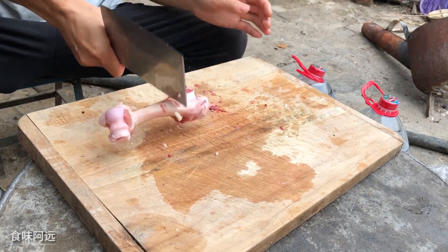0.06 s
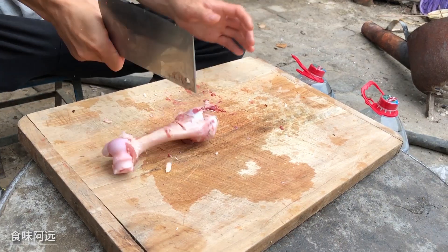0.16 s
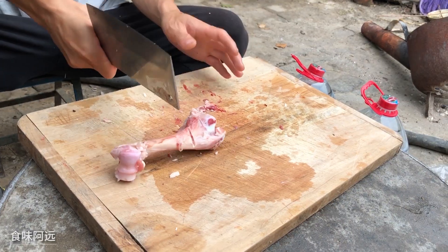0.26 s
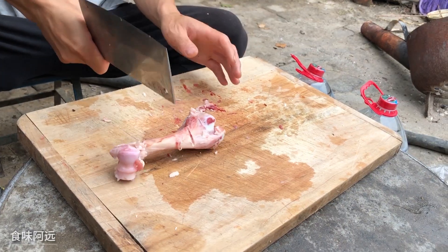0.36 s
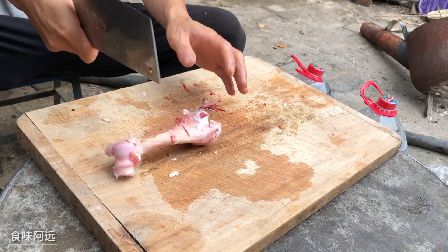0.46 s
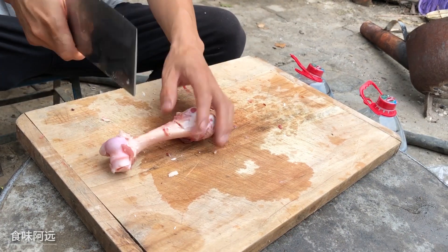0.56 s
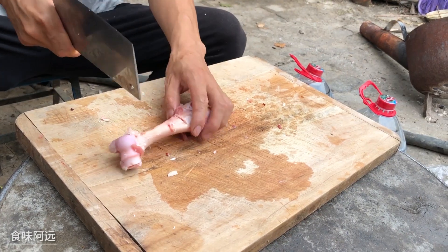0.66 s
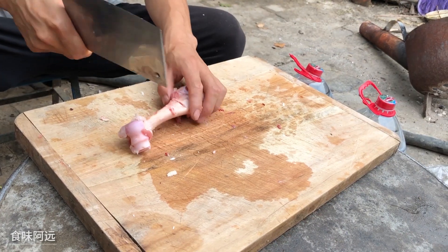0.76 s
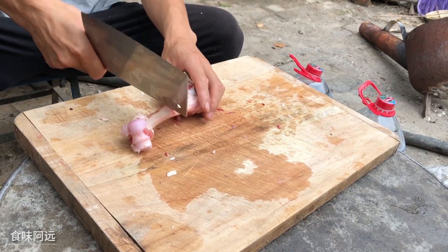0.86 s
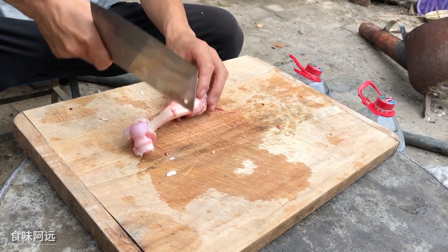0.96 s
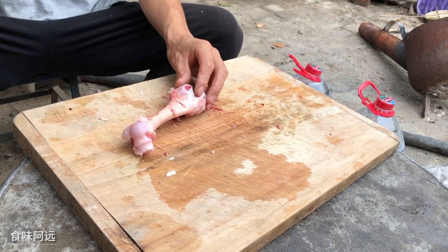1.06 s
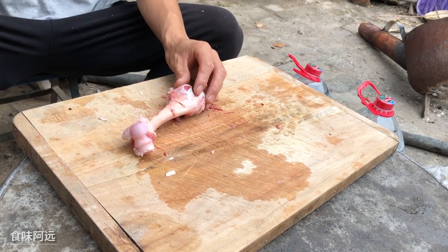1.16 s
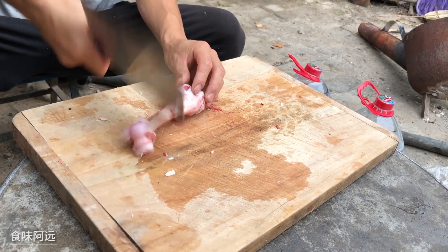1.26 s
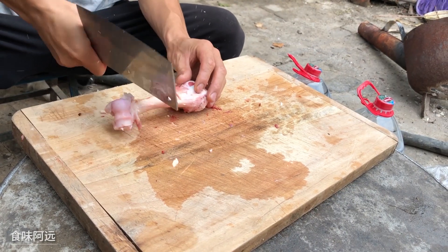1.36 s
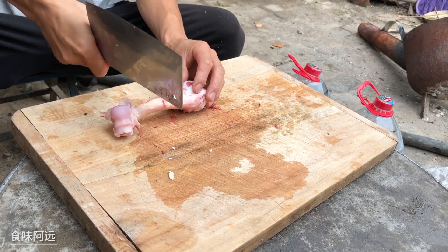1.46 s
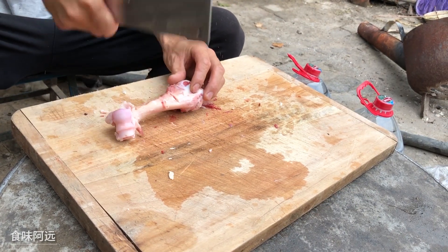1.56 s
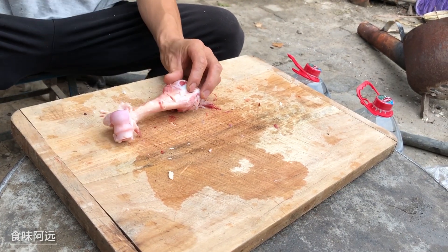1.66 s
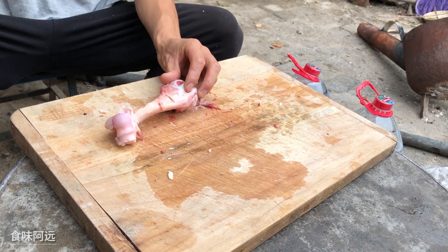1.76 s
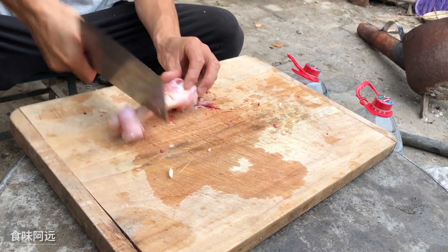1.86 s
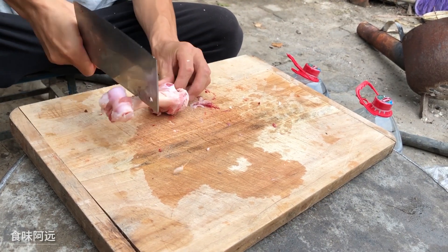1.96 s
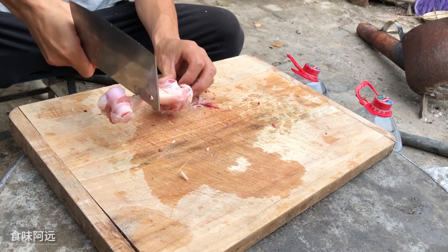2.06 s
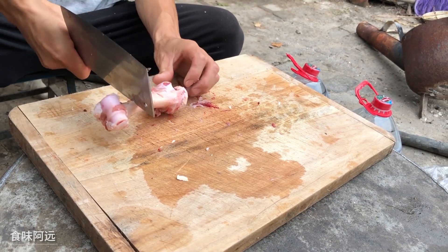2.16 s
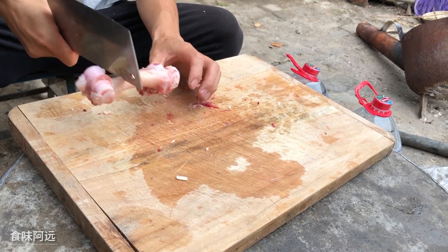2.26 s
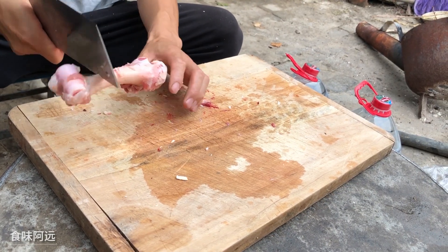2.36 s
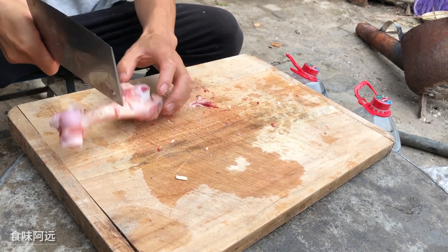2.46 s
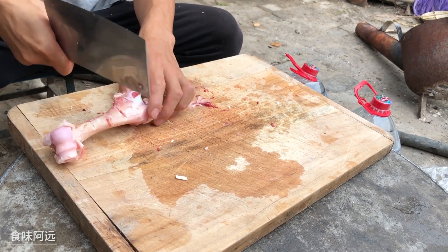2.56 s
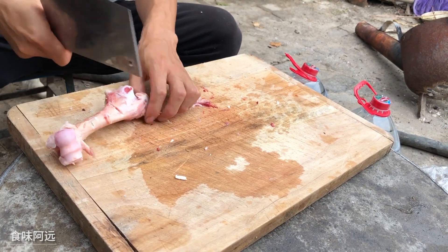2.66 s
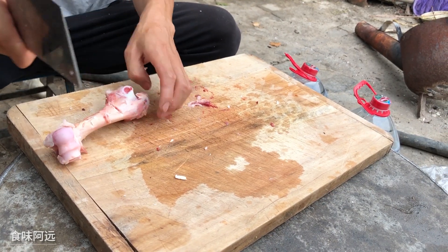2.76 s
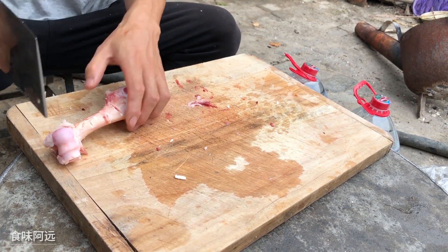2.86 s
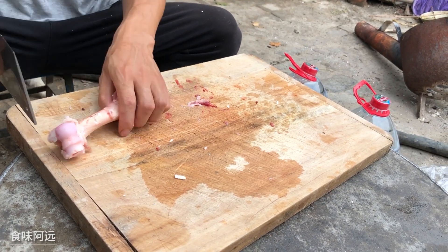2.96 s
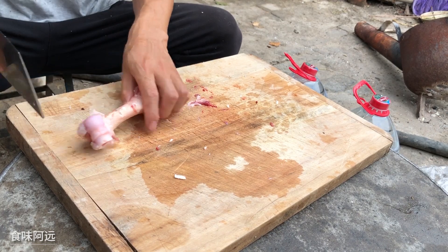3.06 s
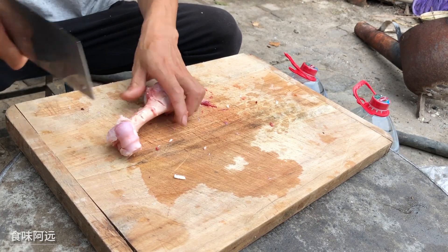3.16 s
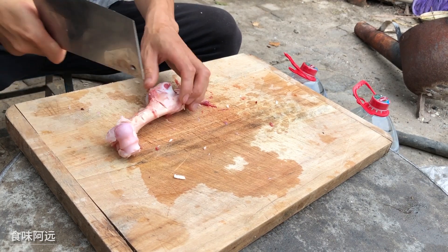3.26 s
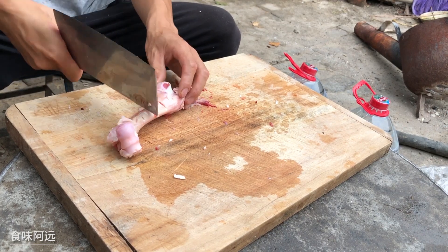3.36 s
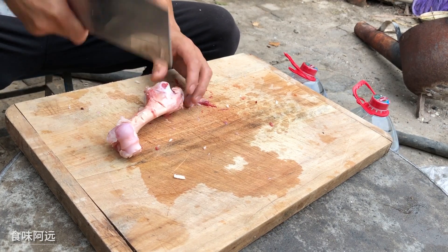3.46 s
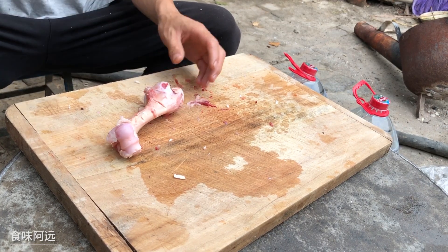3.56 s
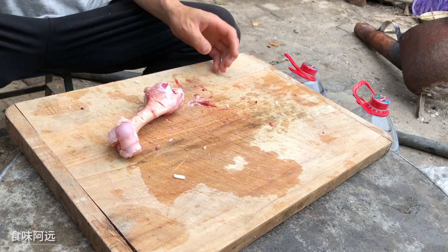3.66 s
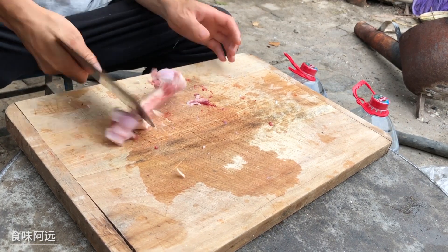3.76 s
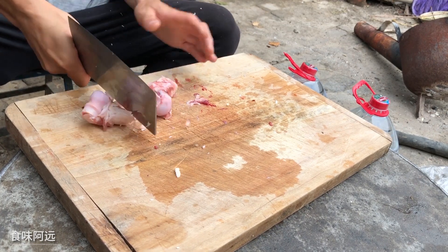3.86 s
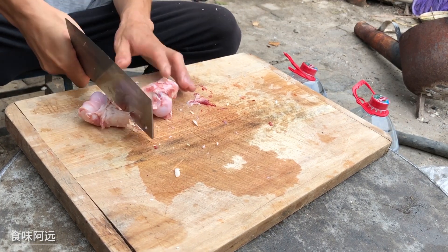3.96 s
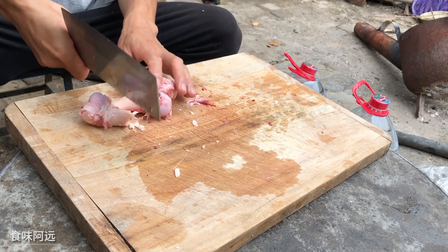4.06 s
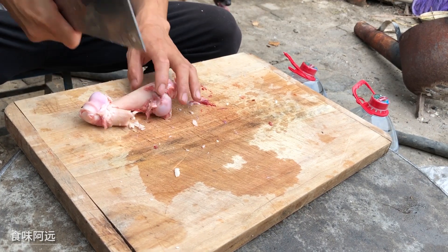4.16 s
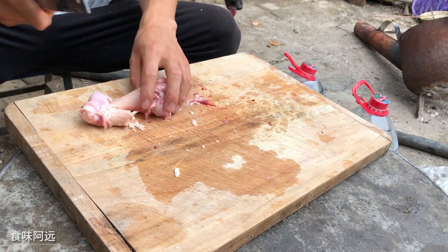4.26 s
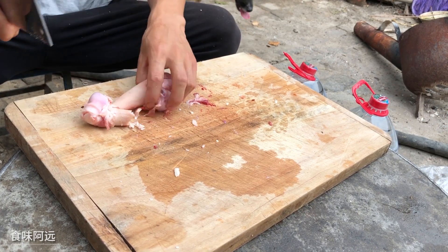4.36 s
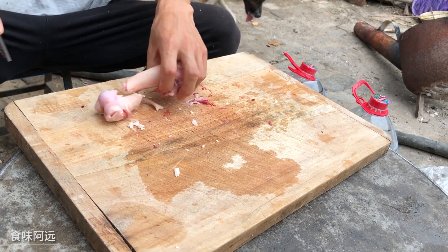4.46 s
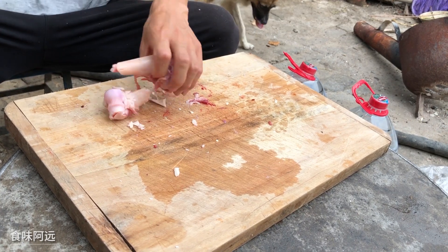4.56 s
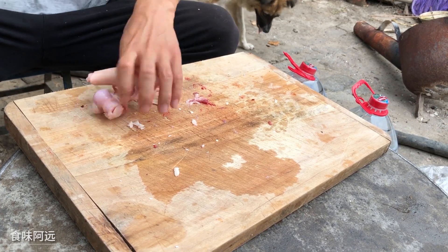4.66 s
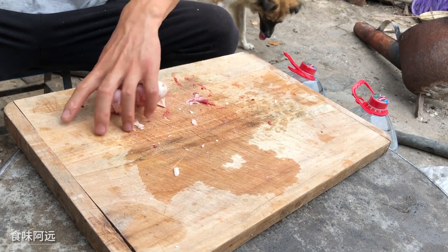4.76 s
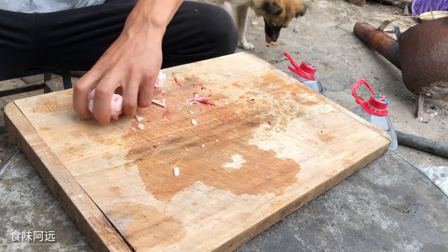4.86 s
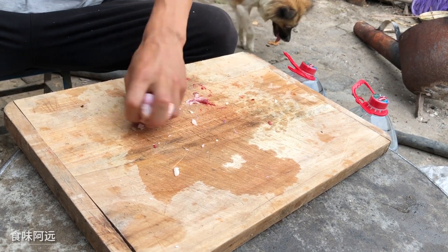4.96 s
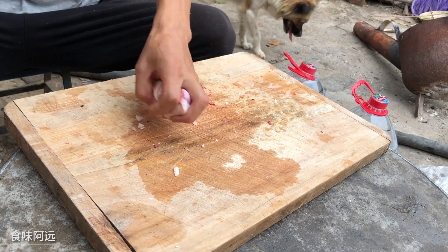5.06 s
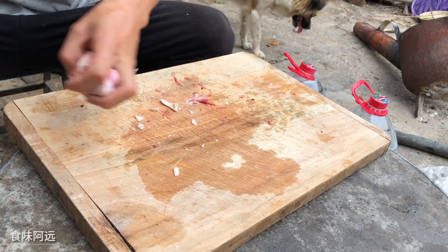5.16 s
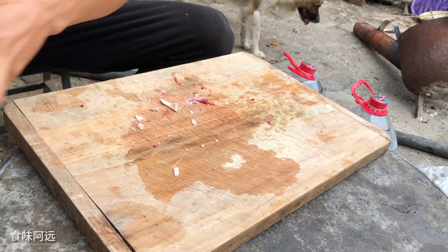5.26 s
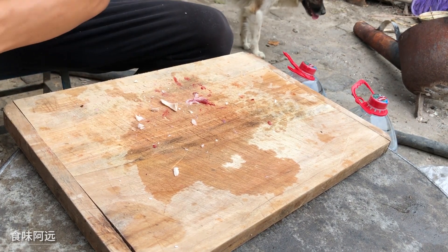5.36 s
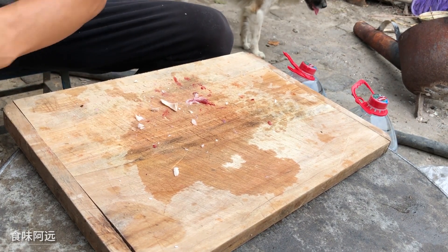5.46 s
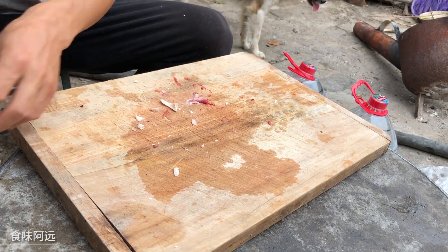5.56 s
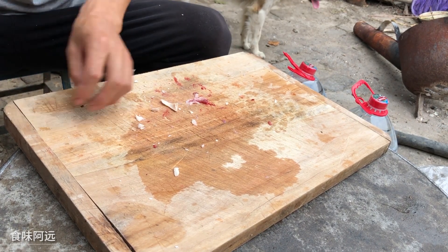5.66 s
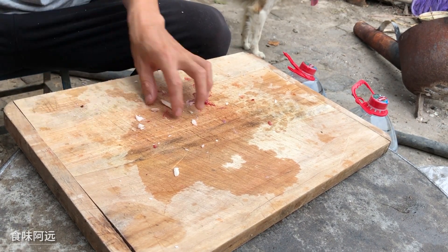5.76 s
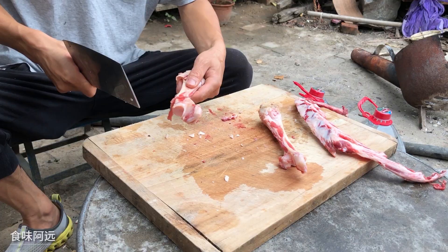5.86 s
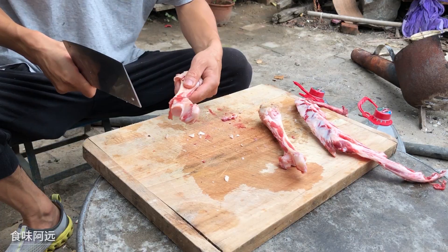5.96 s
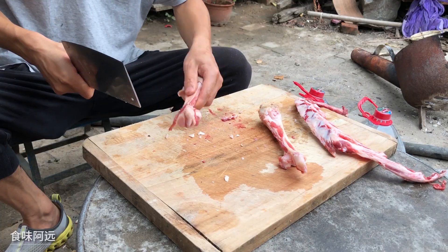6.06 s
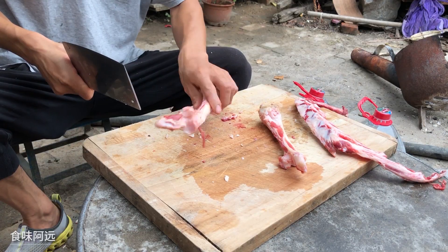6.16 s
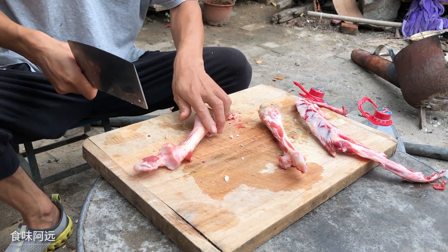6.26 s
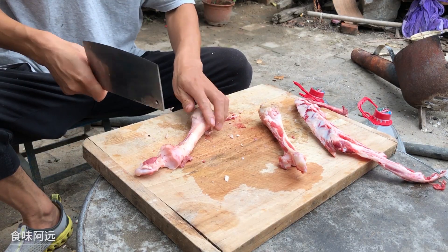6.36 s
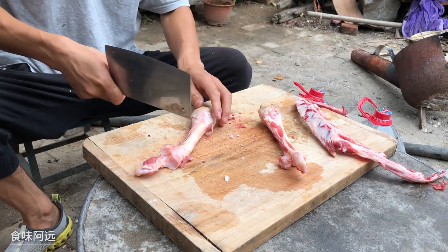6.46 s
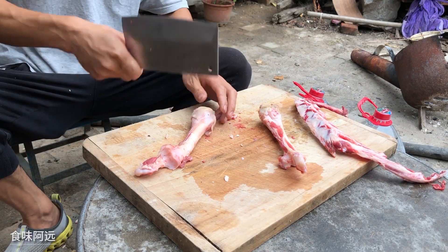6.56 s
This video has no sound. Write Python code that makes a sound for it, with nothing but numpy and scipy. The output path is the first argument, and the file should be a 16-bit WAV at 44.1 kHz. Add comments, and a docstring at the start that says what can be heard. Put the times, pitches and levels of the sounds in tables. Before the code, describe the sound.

A cleaver strikes a leg bone on a thick wooden board outdoors, sharp cracking thuds at uneven intervals, with bone knocks and wet scraping between.

```python
"""Over a low outdoor rumble, two faint ticks lead into the first blow of a cleaver on a leg bone.
Each blow superposes a broadband crack, the modes of a thick wooden board and those of a steel blade;
a wash of rattle and yard echo, as shaped noise, swells and dies after it.
Between blows a hand drags the wet bone: stick-slip noise through the board, sticky ticks and knocks.
A thin high whistle, a sine of unsteady pitch, passes late in the scene."""
import sys
import numpy as np
from scipy import signal
from scipy.fft import rfft, irfft
from scipy.io import wavfile
from scipy.ndimage import uniform_filter1d

SR = 44100
rng = np.random.default_rng(int(sys.argv[2]) if len(sys.argv) > 2 else 0)


def dump_mix(stems):
    """Bounce the given channels to the path in sys.argv[1] as a 16-bit WAV at rate SR."""
    frames = np.atleast_2d(stems).T  # one column per channel
    limited = np.clip(frames, -1, 1)  # hard clip at full scale
    pcm = np.round(limited * 32767).astype(np.int16)
    wavfile.write(sys.argv[1], SR, pcm)


N = 291060

# Spectrum of the outdoor rumble: f/Hz, relative level per Hz/dB
RUMBLE_SPECTRUM = [(15, -49.5), (25, -26), (40, -8.5), (65, -4.5), (201, -9.5), (243, -19.5), (466, -21.5),
                   (519, -25), (645, -25.5), (943, -31.5), (3190, -40.5), (14900, -52), (16200, -45)]
# Course of the rumble, which dips and recovers: t/s, rms level/dB
RUMBLE_LEVEL = [(0.0, -47.5), (0.5, -60), (0.77, -55.5), (0.97, -53), (1.47, -53.5), (1.69, -62),
                (1.97, -67.5), (2.11, -47), (2.32, -62), (3.44, -52), (3.88, -54), (4.12, -56.5),
                (4.37, -58.5), (4.94, -52.5), (5.59, -54), (6.6, -53)]
# Mean pitch of the whistle, which sags, then climbs: t/s, f/Hz
WHISTLE_PITCH = [(5.699, 14250), (5.77, 13800), (5.866, 14600), (5.89, 14300)]
# Sticky ticks of wet meat letting go: t/s, level/dB, centre f/Hz
STICKY_TICKS = [(0.278, -55, 11600), (0.349, -59, 4500), (.731, -57, 11900), (.738, -56.5, 11800),
                (.81, -56, 6000), (0.849, -46.5, 14300), (0.924, -65, 3500), (2.174, -62.5, 5980),
                (2.236, -64, 5930), (2.789, -66.5, 8120), (2.897, -57.5, 5580), (2.94, -56, 3000),
                (3.223, -55, 12770), (3.932, -47, 14000), (3.961, -54, 13000), (4.393, -56.5, 10780),
                (4.488, -49, 15000), (4.493, -55, 12970), (4.704, -51.5, 12060), (4.745, -57, 11100),
                (4.765, -54, 14140), (4.795, -60.5, 12100), (4.82, -54, 3040), (5.045, -51.5, 4050),
                (5.122, -60, 4970), (5.3, -68, 6500), (5.636, -38, 4000), (5.654, -38, 11000),
                (5.659, -41, 6800), (5.687, -46, 6000), (5.845, -54.5, 3340), (6.101, -56.5, 13100),
                (6.145, -62.5, 7500)]
# Modes of the board: f/Hz, relative level/dB, t60 as a factor on the thump's t60
BOARD_MODES = [(158, -18.5, 2.5), (210.5, 6, 1.4), (280, -7.5, 2.3), (317, -18, 2), (445, 1, 0.82),
               (502, -19, 0.26), (575.7, 1.5, 0.85), (677, -4.5, 0.52), (817, -8, 0.95),
               (967.7, -0.5, 0.52), (1187, 3.5, 0.44), (1404.6, -3.5, 0.7), (1774, -8.5, 0.91),
               (2023, -4.5, 0.61), (2520, 0, 0.28), (3380, -9.5, 0.21)]
# Modes of the blade: f/Hz, relative level/dB, t60 of the main decay/s
BLADE_MODES = [(3175, 4, .1), (4475, 1, .085), (5675, -6, .18), (6530, -10, .12), (8380, -3, .13)]
# Spectrum of bone rasping on wood: f/Hz, relative level per Hz/dB
RASP_SPECTRUM = [(1200, -22), (1900, -4), (2600, 0), (3300, -9), (4500, -10), (6000, -22), (9000, -40)]
# Spectrum of the wet hiss: f/Hz, relative level per Hz/dB
HISS_SPECTRUM = [(4000, -40), (7500, -4), (13000, -1.0), (16000, -0.5)]
# Strokes of hand and bone over the board: t/s, length/s, scrape level/dB,
# rasp and wet hiss relative to the scrape/dB, scrape centre f/Hz
DRAG_STROKES = [(.555, 0.021, -69, -1.5, -12.5, 671), (0.646, 0.17, -64, -10, -10, 700),
                (0.791, 0.056, -53, -9.5, -20, 700), (.918, 0.031, -58, -13.5, -27, 700),
                (1.238, 0.095, -68.5, -11.5, 1, 710), (2.68, 0.14, -63, -13, -14, 693),
                (2.937, 0.082, -58, -17.5, -22.5, 698), (2.996, 0.063, -46.5, -12, -22, 666),
                (3.166, 0.024, -63, -15, -30, 603), (3.235, 0.059, -64, -1.5, -13, 700),
                (3.402, 0.046, -57.5, -5.5, -27, 698), (4.358, 0.062, -57.5, -10, -18.5, 700),
                (4.469, 0.099, -61.5, -5.5, -8.5, 700), (4.654, 0.066, -64.5, 0, -13.5, 700),
                (4.716, 0.097, -55.5, -11, -18, 1243), (4.83, 0.079, -59.5, -9, -7, 700),
                (4.878, 0.084, -49.5, -9, -16.5, 600), (4.92, 0.049, -45, -6, -22, 920),
                (4.985, 0.077, -53, -2.5, -15.5, 700), (5.115, 0.094, -71, -3.5, -11, 707),
                (5.625, 0.067, -42, -6.5, -15, 700), (5.70, 0.27, -63.5, -7.5, -10, 700),
                (5.86, 0.033, -46.5, -6, -17, 581), (6.0, 0.22, -80, -7, -3.5, 700),
                (6.215, 0.081, -67.5, -6.5, -2, 705), (6.302, 0.025, -53, -13.5, -23, 923)]
# Spectrum of rattle and echo: f/Hz, relative level per Hz/dB
WASH_SPECTRUM = [(29, -39.5), (50, -11), (418, 1.5), (694, -6), (1400, -8.5), (1780, -11), (2110, -14),
                 (4240, -25.5), (8540, -34.5), (9180, -37), (16000, -43)]
# Decay of rattle and echo: f/Hz, t60/s
WASH_DECAY = [(60, .8), (150, 0.52), (400, 0.44), (1000, 0.31), (3000, 0.33), (8000, .3), (12000, 0.27),
              (16000, .3)]
# Spectrum of the splitting edge: f/Hz, relative level per Hz/dB
CRACK_SPECTRUM = [(2000, -26.5), (4500, 3.5), (6500, 5), (10000, 1), (13000, -0.5), (16300, -6.5)]
# Spectrum of the bone's own click: f/Hz, relative level per Hz/dB
SNAP_SPECTRUM = [(900, -18), (1600, -3), (2400, 0), (3300, -3), (4500, -12), (7000, -32)]
# Pairs of faint ticks just ahead of four blows: t/s, first tick's thump level/dB, its crack level/dB
LEAD_TICKS = [(0.0476, -24, -31.5), (1.3325, -22.5, -30), (1.924, -43, -40.5), (3.8006, -32, -27)]
# The blade is grazed and sings faintly: t/s, reference level/dB, tilt/(dB per octave)
BLADE_GRAZE = (3.638, -84, -35)
# Bone knocking on the board: t/s, thump, snap and crack levels/dB, thump centre f/Hz,
# thump focus/(dB per octave squared, sign ignored)
BONE_KNOCKS = [(0.078, -12, -17, -46.5, 540, 15), (0.089, -25, -8.5, -40, 830, 1),
               (0.11, -11, -10, -37, 401, 45), (0.123, -16.5, -41, -29, 401, 1),
               (0.139, -16.5, -32, -24.5, 403, 2), (0.172, -43, -52, -52, 417, 1),
               (0.242, -15, -43, -71, 740, 4), (0.586, -47.5, -68, -82.5, 555, 12.5),
               (0.647, -44.5, -53.5, -70, 702, 3), (0.684, -43, -52, -71, 690, 5),
               (0.704, -48, -51, -75, 560, 5), (0.719, -40.5, -43.5, -67, 594, -0.5),
               (0.792, -39.5, -47, -57.5, 557, 4), (0.823, -25.5, -73, -67, 500, 14),
               (1.361, -15, -23.5, -34, 490, 27), (1.387, -26, -13.5, -40, 414, 25),
               (1.534, -36, -57.5, -68, 408, 6), (1.967, -15, -19, -43, 830, 35),
               (1.976, -11, -15.5, -37, 895, 15), (1.987, -11, -19, -28, 625, 8),
               (2.053, -30, -58, -54, 390, 15), (2.22, -37.5, -77.5, -71, 448, 13.5),
               (2.565, -10, -37.5, -38.5, 604, 7), (2.598, -30, -40, -63.5, 587, 23),
               (2.771, -42, -69.5, -75, 454, 6), (2.962, -36, -52, -66, 433, 10),
               (2.994, -36.5, -40.5, -52, 2450, 25), (3.17, -27, -53.5, -66, 428, 12),
               (3.215, -34, -69, -66, 396, -1), (3.831, -9, -30, -25, 606, 17),
               (3.944, -13, -30, -48, 620, 11), (4.377, -51.5, -38, -55, 573, 10.5),
               (4.514, -45, -61, -53, 583, 4), (4.554, -38, -37, -53.5, 2380, 8),
               (4.721, -41.5, -66, -71, 1460, 26), (4.735, -50, -60, -59, 1370, 11),
               (4.882, -37, -56, -61, 447, 20), (4.893, -38.5, -56, -55.5, 469, 18),
               (4.923, -33, -52, -58, 619, 30), (4.943, -34.5, -56, -62, 660, 19),
               (5.022, -42, -52, -55, 584, 1), (5.098, -36, -37.5, -58.5, 590, 1),
               (5.196, -48, -48, -73.5, 432, -9), (5.616, -16, -14, -17.5, 665, 8.5),
               (5.699, -46, -36.5, -29.5, 474, 7), (5.877, -25.5, -41.5, -65.5, 528, 25),
               (6.328, -1, -10, -46, 1197, 6.5), (6.341, -18, -27, -54, 1290, 28),
               (6.4, -16, -50, -65, 1113, 11), (6.494, -49, -64, -75, 560, 11)]
# Cleaver blows: t/s, thump, snap and crack levels/dB, thump centre f/Hz, thump t60/s,
# thump focus/(dB per octave squared), wash level before its envelope/dB, wash swell/s, wash treble/dB,
# blade reference level/dB, blade tilt/(dB per octave)
CLEAVER_BLOWS = [(0.0708, -0.5, -1.5, -1.5, 840, 0.044, 5, -22.5, 0.027, 10.5, -56.5, 2),
                 (0.0969, -5.5, -20, -20, 2360, 0.11, 3.5, -33.5, 0.0079, -5.5, -41, 0),
                 (0.947, -2, -6, -24.5, 653, 0.053, 7.5, -33.5, 0.0091, -4, -38.5, -8.5),
                 (1.3555, 3, 0.5, -1.5, 877, 0.013, 11.5, -22, 0.025, 10, -36.5, 3),
                 (1.3741, -18, -19.5, -22, 920, 0.23, 31, -38, .012, -0.5, -39.5, 18.5),
                 (1.946, -8, -10, -6, 914, 0.052, 4, -27, 0.015, 20.5, -43, 17.5),
                 (2.5773, -2.5, -17, -26, 827, 0.053, 7, -37, 0.015, -24.5, -62, -24.5),
                 (3.435, -5.5, -4.5, -13, 519, 0.068, 9, -34, 0.0046, 7, -48.5, 2),
                 (3.8095, -14.5, -58.5, -56.5, 564, .15, 50, -54, 0.0068, -6, -49, -23),
                 (3.824, -3.5, -0.5, 3, 660, 0.037, 7, -23.5, 0.028, 22, -44.5, 7.5),
                 (3.8449, -9.5, -4.5, -8, 590, 0.19, 49, -29, 0.021, 19.5, -44, 16)]

WHISTLE_DB, WHISTLE_FADE_S = -77, .01
GRIP_S, LIFT_S, EASE_DB = 0.012, .12, -3.5  # a stroke grips, eases along its length, then falls by 60 dB
SCRAPE_T60_S, SCRAPE_FOCUS_DB = .04, 6
RATTLE_DB, RATTLE_CLUMP_DB = -6, 7  # board rattle relative to the wash; depth of its clumps
RATTLE_T60_S, RATTLE_FOCUS_DB = .06, 3
LEAD_GAP_S, LEAD_SECOND_DB, LEAD_SNAP_DB = 0.014, -3.5, -3.5  # second tick under first; snap under thump
KNOCK_T60_S, KNOCK_SWELL_S, KNOCK_WASH_DB = .05, 0.0061, -30  # wash relative to the thump
KNOCK_TREBLE_DB, TREBLE_PER_CRACK = 4, 0.24  # wash treble; its rise in dB per dB of crack over thump
EDGE_HZ = 16250  # upper band limit


def gain_of(db):
    """Level law: an amplitude ratio is 10 to the power of dB / 20."""
    return 10 ** (np.asarray(db) / 20)


def evened(x):
    """Normalisation of mean power: scales x to rms 1."""
    return x / np.sqrt(np.mean(x ** 2) + 1e-20)


def smoothed(x, size, axis=-1):
    """Moving average, scaled to rms 1: only slow fluctuation survives."""
    return evened(uniform_filter1d(x, size=size, axis=axis))


def patchy(x, across_bands, across_frames):
    """Averaging over both axes, scaled to rms 1: correlated patches in time and frequency."""
    return smoothed(uniform_filter1d(x, size=across_bands, axis=0), across_frames, axis=1)


def read(points, hz):
    """Interpolation of a spectrum table on a logarithmic frequency axis."""
    f, value = np.transpose(points)
    return np.interp(np.log(hz + 1), np.log(f + 1), value)


def follow(rows, column, t):
    """Linear interpolation of one column of a curve at times t."""
    return np.interp(t, [r[0] for r in rows], [r[column] for r in rows])


def coloured(x, points):
    """Filtering by multiplication of spectra, scaled to rms 1."""
    hz = np.fft.rfftfreq(len(x), 1 / SR)
    return evened(irfft(rfft(x) * gain_of(read(points, hz)), len(x)))


def add(mix, s, sound):
    """Linear superposition: adds a sound at s seconds."""
    part = mix[round(s * SR):][:len(sound)]
    part += sound[:len(part)]


def rumble():
    """Random-phase noise of distant traffic and air: random spectra with drifting patches of level."""
    frames, hz = N // 256 + 5, np.fft.rfftfreq(1024, 1 / SR)
    real, imag, patches = rng.standard_normal((frames, 513, 3)).T
    level_db = read(RUMBLE_SPECTRUM, hz)[:, None] + 0.58 * patchy(patches, 8, 12)
    spectra = (real + 1j * imag) * gain_of(level_db)
    noise = evened(signal.istft(spectra, nperseg=1024, noverlap=768)[1][:N])
    return gain_of(follow(RUMBLE_LEVEL, 1, np.arange(N) / SR)) * noise


def whistle():
    """Frequency modulation: the phase of a sine is the integral of its unsteady frequency."""
    out, t = np.zeros(N), np.arange(WHISTLE_PITCH[0][0], WHISTLE_PITCH[-1][0], 1 / SR)
    hz = follow(WHISTLE_PITCH, 1, t) + 80 * smoothed(rng.standard_normal(len(t)), 100)
    fade = np.clip(np.minimum(t - t[0], t[-1] - t) / WHISTLE_FADE_S, 0, 1)
    tone = np.sin(2 * np.pi * np.cumsum(hz) / SR)
    add(out, t[0], np.sqrt(2) * gain_of(WHISTLE_DB) * fade * tone)
    return out


def ticks():
    """Sudden release of adhesion: a few milliseconds of decaying noise around a centre frequency."""
    out, t = np.zeros(N), np.arange(512) / SR
    for s, db, hz in STICKY_TICKS:
        puff = coloured(rng.standard_normal(512), [(hz / 2, -18), (hz, 0), (hz * 2, -14)])
        add(out, s, gain_of(db - 60 * t / 0.0083) * puff)
    return out


def thump(db, centre_hz, t60, focus_db):
    """Modal excitation: a push of about 2 ms rings board modes near the centre, reweighted at each spot."""
    t = np.arange(round(min(.3, 2 * t60) * SR)) / SR
    hz, mode_db, stretch = np.transpose(BOARD_MODES)[:, :, None]
    level_spread, pitch_spread, phase_spread = rng.standard_normal((3, len(BOARD_MODES), 1))
    near_db = -abs(focus_db) * np.log2(hz / centre_hz) ** 2 + 0.52 * level_spread
    swing = np.sin(2 * np.pi * hz * (1 + 0.024 * pitch_spread) * t + 1.5 * phase_spread)
    decaying = gain_of(mode_db + near_db - 60 * t / (stretch * t60)) * swing
    ring = decaying.sum(0) * np.minimum(t / 0.0017, 1) ** 2
    return gain_of(db) * ring / abs(ring).max()


def through_board(x, centre_hz, t60, focus_db):
    """Convolution: a force x shakes the board and sounds in the board's modes."""
    ring = thump(0, centre_hz, t60, focus_db)
    return signal.fftconvolve(x, ring / np.linalg.norm(ring))[:len(x)]


def dragging():
    """Stick-slip friction: clumped noise shakes the board and rasps above it, with a wet hiss on top."""
    out, t = np.zeros(N), np.arange(12288) / SR
    for s, length, db, rasp_db, hiss_db, centre_hz in DRAG_STROKES:
        slip, scrape_noise, rasp_noise, fizz, hiss_noise = rng.standard_normal((len(t), 5)).T
        clumps = gain_of(4.5 * smoothed(slip, 250))
        scrape = evened(through_board(clumps * scrape_noise, centre_hz, SCRAPE_T60_S, SCRAPE_FOCUS_DB))
        rasp = coloured(clumps * rasp_noise, RASP_SPECTRUM)
        hiss = coloured(gain_of(3.5 * smoothed(fizz, 60)) * hiss_noise, HISS_SPECTRUM)
        easing_db = EASE_DB * np.minimum(t / length, 1)
        lifting_db = -60 * np.maximum(t - length, 0) / LIFT_S
        touch = np.minimum(t / GRIP_S, 1) * gain_of(db + easing_db + lifting_db)
        add(out, s, touch * (scrape + gain_of(rasp_db) * rasp + gain_of(hiss_db) * hiss))
    return out


def wash(db, swell, treble_db):
    """Frequency-dependent decay: lumpy noise of rattle and yard echo swells, then dies band by band."""
    hz, t = np.fft.rfftfreq(256, 1 / SR), np.arange(340) * 64 / SR
    real, imag, lumps = rng.standard_normal((340, 129, 3)).T
    # the treble setting takes hold from 1.5 kHz and is complete at 12 kHz
    treble = treble_db * np.clip(np.log2((hz + 1) / 1500) / 3, 0, 1)
    steady = gain_of(read(WASH_SPECTRUM, hz) + treble)[:, None]
    steady = steady / np.sqrt(np.mean(steady ** 2))
    dying_db = -60 * np.maximum(t - swell, 0) / read(WASH_DECAY, hz)[:, None]
    spectra = (real + 1j * imag) * steady * gain_of(dying_db + 2 * patchy(lumps, 6, 5))
    noise = signal.istft(spectra, nperseg=256, noverlap=192)[1]
    rise = np.minimum(np.arange(len(noise)) / SR / max(swell, .002), 1) ** 0.77
    return gain_of(db) * rise * noise / np.sqrt(3 * 128 / 4)  # transform gain, to about unit rms


def aftermath(centre_hz, *shape):
    """Repeated excitation: with the wash, loose pieces rattle the board in short sharp clumps."""
    noise = wash(*shape)
    clumps = gain_of(RATTLE_CLUMP_DB * smoothed(rng.standard_normal(len(noise)), 120))
    rattle = through_board(np.gradient(noise) * clumps, centre_hz, RATTLE_T60_S, RATTLE_FOCUS_DB)
    return noise + gain_of(RATTLE_DB) * noise.std() * evened(rattle)


def blade(db, tilt_db):
    """Damped plate modes: thin lines of the steel ring on and flutter in the grip."""
    t = np.arange(round(.4 * SR)) / SR
    hz, mode_db, t60 = np.transpose(BLADE_MODES)[:, :, None]
    flutter = smoothed(rng.standard_normal((len(BLADE_MODES), len(t))), 500, axis=1)
    level_db = db + mode_db + tilt_db * np.log2(hz / 5000) + 1.5 * flutter
    # the grip damps most of the ring; a little lingers
    dying = gain_of(-60 * t / t60) + gain_of(-21 - 60 * t / (2.3 * t60))
    onset = np.minimum(t / 0.0027, 1)
    return (gain_of(level_db) * dying * onset * np.sin(2 * np.pi * hz * t)).sum(0)


def burst(db, colour, rise, t60):
    """Impulsive fracture: coloured noise dies exponentially, with faint splintering under it."""
    t = np.arange(2048) / SR
    dying = gain_of(-60 * t / t60) + gain_of(-19.5 - 60 * t / 0.013)
    shape = np.minimum(t / rise, 1) ** 2 * dying
    return gain_of(db) * shape * coloured(rng.standard_normal(2048), colour) / 2  # peak near twice the rms


def impact(thump_db, snap_db, crack_db, *ring):
    """Superposition by rise time: crack first, the snap and the board's thump just behind."""
    out = thump(thump_db, *ring)
    add(out, 0, burst(crack_db, CRACK_SPECTRUM, 0.000067, 0.011))
    add(out, 0, burst(snap_db, SNAP_SPECTRUM, .0008, .026))
    return out


def lead_ticks():
    """Two faint ticks, the second a little weaker, sound just ahead of a blow."""
    out = np.zeros(N)
    for s, thump_db, crack_db in LEAD_TICKS:
        for late, db in ((0, 0), (LEAD_GAP_S, LEAD_SECOND_DB)):
            tick = impact(thump_db, thump_db + LEAD_SNAP_DB, crack_db, 900, 0.056, 6)
            add(out, s + late, gain_of(db) * tick)
    return out


def knocking():
    """Impact of bone on wood: the more a knock cracks, the brighter its wash."""
    out = np.zeros(N)
    for s, thump_db, snap_db, crack_db, centre_hz, focus_db in BONE_KNOCKS:
        add(out, s, impact(thump_db, snap_db, crack_db, centre_hz, KNOCK_T60_S, focus_db))
        treble_db = KNOCK_TREBLE_DB + TREBLE_PER_CRACK * (crack_db - thump_db)
        add(out, s, aftermath(centre_hz, thump_db + KNOCK_WASH_DB, KNOCK_SWELL_S, treble_db))
    return out


def chopping():
    """Coupled impact: a blow cracks bone and rings board and blade, each with its aftermath."""
    out = np.zeros(N)
    for (s, thump_db, snap_db, crack_db, centre_hz, t60, focus_db,
         wash_db, swell, treble_db, blade_db, tilt_db) in CLEAVER_BLOWS:
        add(out, s, impact(thump_db, snap_db, crack_db, centre_hz, t60, focus_db))
        add(out, s, blade(blade_db, tilt_db))
        add(out, s, aftermath(centre_hz, wash_db, swell, treble_db))
    add(out, BLADE_GRAZE[0], blade(*BLADE_GRAZE[1:]))
    return out


def scene():
    """Superposition of pressures: everything reaches one microphone."""
    background = rumble() + whistle()
    handling = ticks() + dragging() + knocking()
    return (background + handling + lead_ticks() + chopping())[None]


def record(dry):
    """Band limitation and clipping: deep bass is dropped, peaks clip at full scale, then treble is cut."""
    high_pass = signal.butter(3, 45, "high", fs=SR, output="sos")
    clipped = np.clip(signal.sosfilt(high_pass, dry), -1, 1)
    low_pass = signal.firwin(511, EDGE_HZ, window=("kaiser", 9), fs=SR)
    return signal.oaconvolve(clipped, low_pass[None], "same")


dry = scene()
out = record(dry)
dump_mix(out)
```